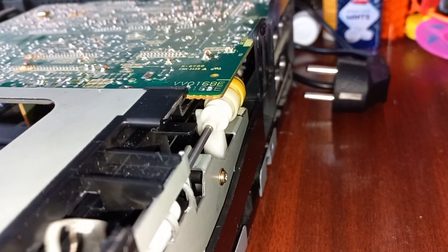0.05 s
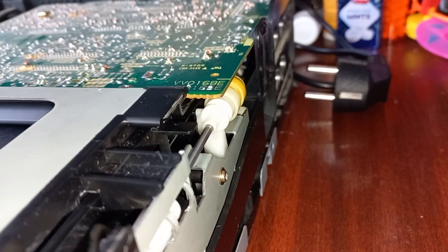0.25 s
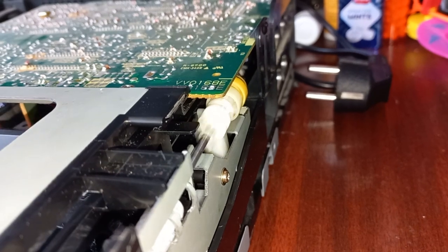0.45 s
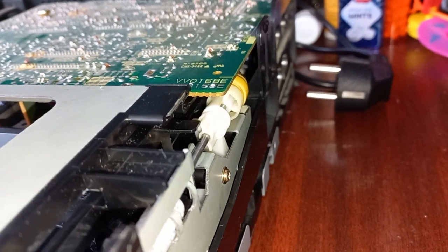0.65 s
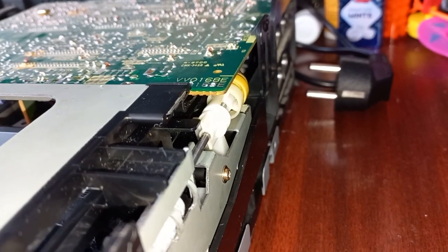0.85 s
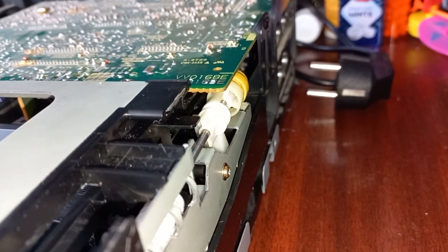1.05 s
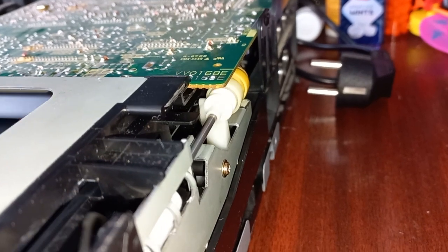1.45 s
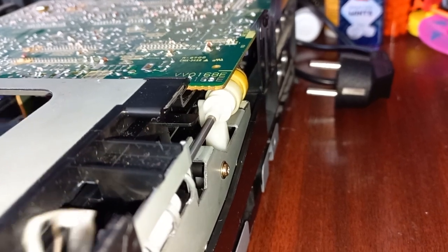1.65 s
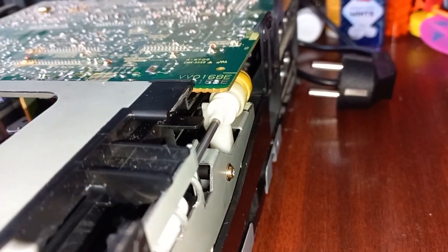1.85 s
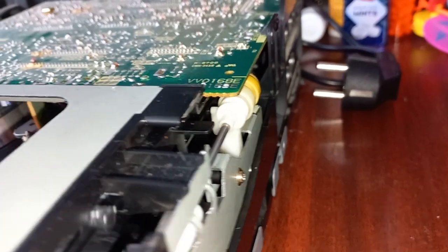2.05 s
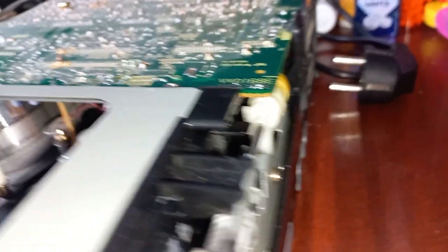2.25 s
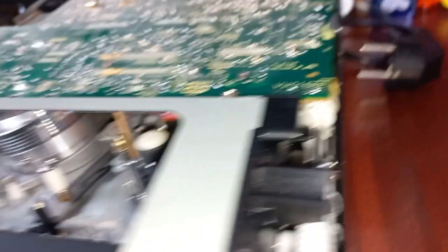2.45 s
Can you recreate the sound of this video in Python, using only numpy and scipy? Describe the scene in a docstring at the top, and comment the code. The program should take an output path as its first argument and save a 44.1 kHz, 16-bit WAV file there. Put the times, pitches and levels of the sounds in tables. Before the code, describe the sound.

Close by in a small room, the mechanism of an open video cassette player whirs with a burst of clattering knocks. It pauses briefly, then the gears whir, rattle and tick again until a last knock stops them.

```python
"""An opened video cassette player works on a table, heard from close by in a small room.
First the loading motor whirs and the reel drive whines. Impacts of the carriage excite the frame's
modes, the heaviest shakes the table top, latches snap and the worm gear ticks. The motor pauses;
the whine sags and recovers as the tape rustles. Then the motor runs again: latches snap,
cam gears rub, the worm ticks, and a last knock ends the run."""
import sys
import numpy as np
from scipy import signal
from scipy.fft import rfft, irfft
from scipy.io import wavfile

SR = 44100
rng = np.random.default_rng(int(sys.argv[2]) if len(sys.argv) > 2 else 0)


def master(y):
    """Save y as 16-bit WAV."""
    cut = np.clip(np.atleast_2d(y).T, -1, 1)
    pcm = np.round(cut * 32767)  # scale
    wavfile.write(sys.argv[1], SR, pcm.astype(np.int16))


N = 110250


def amp(db):
    """Amplitude ratio of a level in decibels."""
    return 10 ** (np.asarray(db) / 20)


def unit(x):
    """Normalisation to an rms of 1."""
    return x / np.sqrt(np.mean(x ** 2) + 1e-20)


def by_hz(table, hz, column=1):
    """Interpolation on a logarithmic frequency axis."""
    columns = np.transpose(table)
    return np.interp(np.log(hz + 1), np.log(columns[0]), columns[column])


def by_time(table):
    """Linear interpolation at every sample."""
    return np.interp(np.arange(N) / SR, *np.transpose(table))


def add(mix, start_s, sound):
    """Superposition: a sound joins the mix at its start time."""
    part = mix[:, max(round(start_s * SR), 0):][:, :sound.shape[1]]
    part += sound[:, :part.shape[1]]


def drift(cutoff_hz, size=N):
    """Low-passed noise: a random fluctuation of rms 1."""
    hz = np.fft.rfftfreq(size, 1 / SR)
    return unit(irfft(rfft(rng.standard_normal(size)) / (1 + (hz / cutoff_hz) ** 4), size))


# Microphone pair: (frequency [Hz], coherence [0-1], left minus right level [dB])
MIC_PAIR = [(80, 0, 3.5), (380, 0.92, 4.5), (1340, 0.2, 3.5), (5350, 0.08, -0.5), (12000, 0, 6)]
def noise(spectrum, size=N, band_hz=(1, SR)):
    """Partial coherence: coloured noise in a soft-edged band, partly alike at two microphones."""
    hz = np.fft.rfftfreq(size, 1 / SR)
    left, independent = np.exp(2j * np.pi * rng.random((2, len(hz))))
    coherence = by_hz(MIC_PAIR, hz)
    right = coherence * left + np.sqrt(1 - coherence ** 2) * independent
    low, high = band_hz
    detuning = (hz ** 2 - low * high) / ((hz + 1) * (high - low))
    gain = amp(by_hz(spectrum, hz)) / np.sqrt(1 + detuning ** 6)
    return unit(irfft(np.array([left, right]) * gain, size))


def burst(spectrum, band_hz, db, decay_s, size=4096, attack_share=0.36, grit_db=0.5):
    """A contact transient: damped noise, db being the level of its energy spread over 10 ms."""
    t = np.arange(size) / SR
    envelope = (1 - np.exp(-(t / (attack_share * decay_s)) ** 2)) * np.exp(-t / decay_s)
    contact = noise(spectrum, size, band_hz) * envelope * amp(grit_db * drift(1400, size))
    return amp(db) * unit(contact) * np.sqrt(SR / 100 / size)


# Motor speed: (time [s], rotation rate [turns/s])
MOTOR_SPEED = [(.2, 74), (.6, 92), (1.4, 79)]
# Brush noise, gear-train noise and gear-mesh hum: (time [s], level [dB])
BRUSH_LEVEL = [(0, -49.5), (.58, -78.5), (1.2, -91.5), (1.3, -62), (1.64, -56), (1.665, -50),
               (2.295, -59.5), (2.31, -100)]
GEAR_LEVEL = [(0, -47.5), (.18, -54), (.215, -37.5), (.39, -37), (.52, -39), (.6, -58.5), (.75, -55),
              (.79, -79), (1.195, -77.5), (1.215, -48), (1.31, -42.5), (1.41, -57.5), (1.6, -51.5),
              (2.295, -49.5), (2.315, -89.5)]
MESH_LEVEL = [(1.19, -110), (1.22, -64.5), (1.8, -78), (1.95, -62), (2.29, -73.5), (2.32, -100)]
# Spectra of the brushes and gear train: (frequency [Hz], relative level [dB])
BRUSH_SPECTRUM = [(8500, -16.5), (9600, 14), (10600, 11), (11800, -17)]
GEAR_SPECTRUM = [(45, -31.5), (80, -9.5), (350, -4.5), (550, 7.5), (850, -3), (5000, -6.5), (8300, -13),
                 (12500, -15), (16000, -24.5)]
def loading_motor(wobble=0.0043, brush_swing_db=6, gear_depth=0.13, rough_db=0, teeth=3):
    """Amplitude modulation: rotation pulses the brush and gear noise; the mesh hums at the tooth rate."""
    turns_per_s = by_time(MOTOR_SPEED) * (1 + wobble * drift(8.1))
    angle = 2 * np.pi * np.cumsum(turns_per_s) / SR
    brush_pulse = np.cos(angle) + .5 * np.cos(2 * angle) + .5 * np.cos(angle / 2)
    brushes = noise(BRUSH_SPECTRUM) * unit(amp(brush_swing_db * brush_pulse))
    gears = noise(GEAR_SPECTRUM) * unit((1 + gear_depth * np.cos(angle)) * amp(rough_db * drift(350)))
    hum = unit(np.sin(teeth * angle)) * amp(by_time(MESH_LEVEL))
    return brushes * amp(by_time(BRUSH_LEVEL)) + gears * amp(by_time(GEAR_LEVEL)) + hum


# Whine of the reel drive: (time [s], level [dB])
REEL_LEVEL = [(0, -38), (.14, -82), (.39, -35.5), (.58, -51), (.755, -41.5), (.82, -67), (.91, -57),
              (1.0, -55), (1.21, -50.5), (1.27, -100)]
# Its pitch, sagging at the pause: (time [s], frequency [Hz])
REEL_PITCH = [(0, 502), (.3, 484), (.8, 482), (.86, 340.5), (.99, 466), (1.1, 480)]
# Its partials: (frequency ratio [1], relative level [dB])
WHINE_PARTIALS = [(1, 1.5), (1.3, -15), (2.29, -9), (15, -18)]
def reel_drive(waver=0.0014, flutter_db=4, cutoff_hz=462):
    """Forced vibration: the chassis radiates the partials only above about 460 Hz, so the whine fades while its
    pitch sags."""
    hz = by_time(REEL_PITCH) * (1 + waver * drift(40))
    angle = 2 * np.pi * np.cumsum(hz) / SR
    whine = np.zeros(N)
    for ratio, db in WHINE_PARTIALS:
        high_pass = 1 / (1 + (cutoff_hz / (ratio * hz)) ** 20)
        whine += amp(db + flutter_db * drift(34)) * high_pass * np.sin(ratio * angle)
    return unit(whine) * amp(by_time(REEL_LEVEL))


# Background of the room: (frequency [Hz], relative level [dB])
AIR_SPECTRUM = [(130, 0), (550, -8.5), (1200, -21.5), (16000, -35.5)]
def room_air(db=-74):
    """Stationary noise: a faint floor, strongest in the bass."""
    return amp(db) * noise(AIR_SPECTRUM, band_hz=(60, SR))


# Response of the chassis: (frequency [Hz], relative level [dB])
CHASSIS_SPECTRUM = [(60, -16.5), (230, -8.5), (370, -10.5), (500, 4), (680, -0.5), (820, -7.5), (2700, -5),
                    (5500, -8.5), (8300, -14), (12000, -8.5), (16000, -19)]
# Edges of the bass, middle, treble and top bands: (frequency [Hz])
BAND_EDGES_HZ = [60, 900, 2800, 7500, 17000]
def impact(levels_db, decay_s=0.0031, bass_extra_s=0.0065):
    """Frequency-dependent damping: a blow excites four bands of the chassis; the bass lasts longest."""
    return sum(burst(CHASSIS_SPECTRUM, BAND_EDGES_HZ[k:k + 2], db, decay_s + bass_extra_s * (k == 0))
               for k, db in enumerate(levels_db))


# Carriage and lever knocks: (time [s], bass level [dB], middle and treble level [dB], top level [dB])
KNOCKS = [(.061, -36.5, -40, -68), (.191, -43.5, -49.5, -55), (.212, -42.5, -33, -34.5),
          (0.27, -34.5, -52, -51), (.289, -40.5, -37.5, -40), (.314, -31, -32.5, -36),
          (.323, -36, -24.5, -29.5), (0.333, -34, -34.5, -40), (0.356, -32, -34, -34),
          (0.372, -34.5, -37, -38), (0.387, -20.5, -22.5, -36), (0.4319, -35, -27, -34),
          (0.441, -42, -33.5, -37), (0.707, -53.5, -46, -76), (.725, -48, -43.5, -52),
          (1.212, -42, -49, -51.5), (2.135, -48, -50, -56), (2.16, -40, -54, -59.5),
          (2.296, -37, -48.5, -61.5)]
def carriage():
    """Impulsive excitation: the carriage and levers strike the chassis."""
    out = np.zeros((2, N))
    for start_s, bass, middle, top in KNOCKS:
        add(out, start_s, impact([bass, middle, middle, top]))
    return out


# Modes of the metal frame: (frequency [Hz], relative level [dB], 60 dB decay time [s])
FRAME_MODES = [(545, -13, .07), (1335, -15, .25), (1684, -17, .2), (2690, -15, .15), (5309, -12, .15)]
def frame_ring(blows, gain_db=3.5):
    """Modal resonance: every blow sets the frame ringing as a sum of damped sinusoids."""
    t = np.arange(SR // 2) / SR
    response = np.zeros((2, len(t)))
    for hz, db, t60 in FRAME_MODES:
        envelope = amp(db - 60 * t / t60) / np.sqrt(t60 * SR)
        response += envelope * np.sin(2 * np.pi * (hz * t + rng.random((2, 1))))
    return amp(gain_db) * signal.fftconvolve(blows, response, axes=1)[:, :N]


def table_top(start_s=0.388):
    """Structure-borne sound: the heaviest blow shakes the table top into a low, slowly dying thump."""
    out = np.zeros((2, N))
    add(out, start_s, burst(CHASSIS_SPECTRUM, band_hz=(86, 180), db=-46, decay_s=0.1, size=SR // 2))
    return out


# Latch snaps: (time [s], bass level [dB], middle level [dB], treble level [dB], top level [dB],
# ring frequency [Hz], ring level [dB])
SNAPS = [(0.4467, -45, -36, -23.5, -20, 5670, -19.5), (0.503, -36.5, -31.5, -29, -26.5, 5350, -36.5),
         (1.2023, -48.5, -39.5, -31, -28.5, 9920, -27), (1.2639, -45, -34, -28, -24, 12000, -25),
         (1.8882, -44, -38.5, -24, -26, 3542, -25)]
def latches(decay_s=0.0015, bounce_s=0.0085, bounce_db=-13.5, ring_width_hz=1100):
    """Inelastic rebound: each latch strikes, rings in a narrow band and bounces once, more weakly."""
    out = np.zeros((2, N))
    for start_s, *levels_db, ring_hz, ring_db in SNAPS:
        add(out, start_s, impact(levels_db, decay_s))
        add(out, start_s + bounce_s, amp(bounce_db) * impact(levels_db, decay_s))
        band_hz = (ring_hz - ring_width_hz / 2, ring_hz + ring_width_hz / 2)
        add(out, start_s, burst(CHASSIS_SPECTRUM, band_hz, ring_db, decay_s=0.0016))
    return out


# Runs of worm-gear ticks: (start [s], end [s], rate [ticks/s], level [dB])
TICK_RUNS = [(0.568, .705, 42, -66), (1.655, 1.85, 51.5, -53.5), (1.953, 2.1, 33, -47)]
# Spectrum of a tick: (frequency [Hz], relative level [dB])
TICK_SPECTRUM = [(1800, -8.5), (3600, 15.5), (16000, -3)]
def worm_gear(spread_db=2):
    """A periodic pulse train: small ticks, even in spacing and uneven in level."""
    out = np.zeros((2, N))
    for start_s, end_s, rate, db in TICK_RUNS:
        for tick_s in np.arange(start_s, end_s, 1 / rate):
            tick_db = db + spread_db * rng.standard_normal()
            add(out, tick_s, burst(TICK_SPECTRUM, (0, SR), tick_db, decay_s=0.0018))
    return out


# Rustle of the tape transport: (time [s], level [dB])
TAPE_LEVEL = [(.81, -85), (.88, -58.5), (1.19, -55), (2.29, -69), (2.32, -100)]
# Its spectrum: (frequency [Hz], relative level [dB])
TAPE_SPECTRUM = [(60, -24), (380, -10.5), (540, 10.5), (800, -6), (2200, -1), (3300, -13), (7200, -12.5),
                 (16000, -22.5)]
def tape(rough_db=1):
    """Random amplitude modulation: the tape rustles as slightly rough noise."""
    return noise(TAPE_SPECTRUM) * amp(rough_db * drift(250)) * amp(by_time(TAPE_LEVEL))


# Rubs of the cam gears: (time [s], level [dB])
CAM_RUBS = [(1.363, -50), (1.48, -48), (1.526, -41.5), (1.59, -40), (1.662, -43), (1.735, -46.5),
            (1.796, -50)]
# Bass, middle, treble and top of one contact: (relative level [dB])
CAM_BANDS_DB = [1.5, -2, -4, -10]
def cam_gears(contacts=5, gap_s=0.0083, fall_db=3):
    """Frictional chatter: each rub is an irregular, fading run of contacts."""
    out = np.zeros((2, N))
    for start_s, db in CAM_RUBS:
        for k, slip in enumerate(rng.random(contacts)):
            delay_s = gap_s * max(k - slip / 2, 0)
            add(out, start_s + delay_s, amp(db - fall_db * k) * impact(CAM_BANDS_DB))
    return out


# Decay of the room: (frequency [Hz], reverberation time [s])
ROOM_T60 = [(3000, 0.18), (15000, 0.15)]
def room(direct, early_db=-4, early_decay_s=0.0032, early_cutoff_hz=1100, tail_db=-8):
    """Reverberation: early reflections from the case and table, then the room's diffuse tail."""
    t = np.arange(SR // 2) / SR
    hz, times, spectra = signal.stft(rng.standard_normal((2, len(t))), SR, nperseg=256)
    decay = amp(-60 * times / by_hz(ROOM_T60, hz)[:, None])
    tail = signal.istft(spectra * decay, SR, nperseg=256)[1][:, :len(t)]
    early = rng.standard_normal((2, len(t))) * np.exp(-t / early_decay_s) * (t > .001)
    high_pass = signal.butter(2, early_cutoff_hz, "highpass", fs=SR, output="sos")
    early = signal.sosfilt(high_pass, early)  # small panels reflect no bass
    response = amp(tail_db) * unit(tail * (t > .006)) + amp(early_db) * unit(early)
    return signal.fftconvolve(direct, response / np.sqrt(len(t)), axes=1)[:, :N]


def scene():
    """Superposition: the mechanism and its reflections, with thump, whine and air added dry."""
    whine, rustle = reel_drive(), tape()
    blows = carriage() + cam_gears() + latches()
    direct = blows + frame_ring(blows) + loading_motor() + worm_gear() + rustle
    return direct + room(direct) + table_top() + whine + room_air()


def record(dry, left_lead_s=0.000471, cutoff_hz=16300):
    """Path difference: the nearer left microphone is earlier and louder; a low-pass limits the band."""
    hz = np.fft.rfftfreq(2 * N, 1 / SR)
    left_gain = amp(by_hz(MIC_PAIR, hz, column=2))
    right_delay = np.exp(-2j * np.pi * hz * left_lead_s)
    response = np.array([left_gain, right_delay]) * np.sqrt(2 / (1 + left_gain ** 2))  # constant power
    heard = irfft(rfft(dry, 2 * N) * response)[:, :N]
    low_pass = signal.firwin(255, cutoff_hz, window=("kaiser", 9), fs=SR)
    return signal.oaconvolve(heard, low_pass[None], "same")


dry = scene()
out = record(dry)
master(out)
```